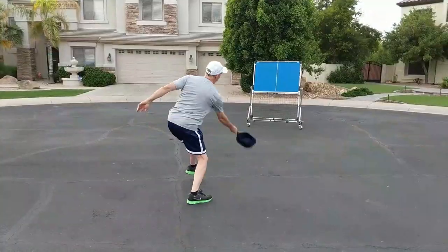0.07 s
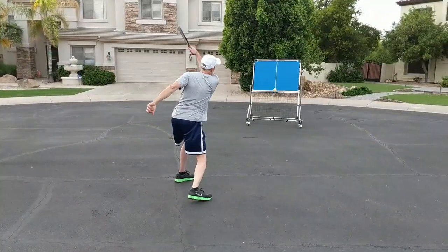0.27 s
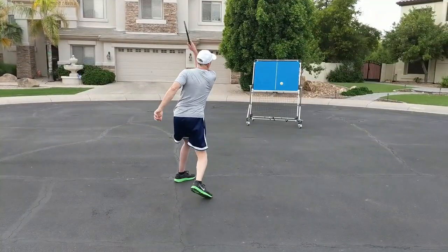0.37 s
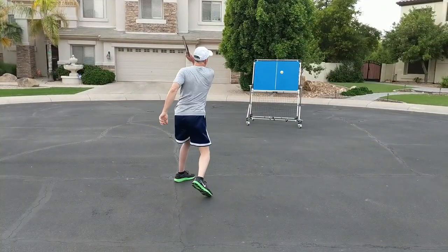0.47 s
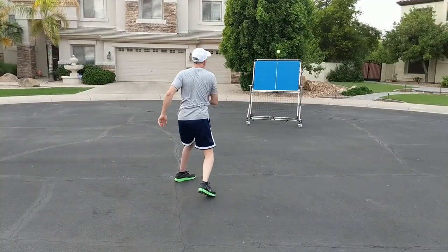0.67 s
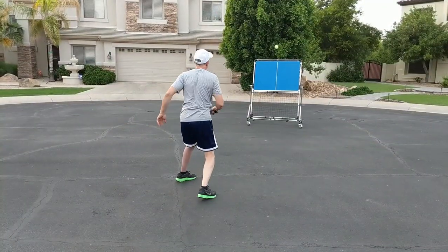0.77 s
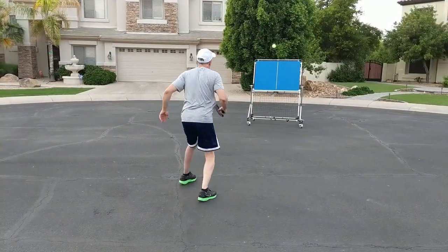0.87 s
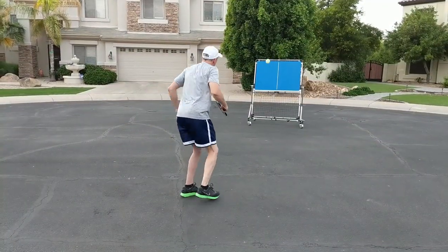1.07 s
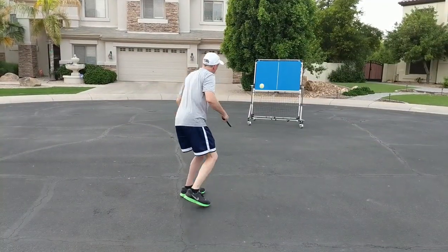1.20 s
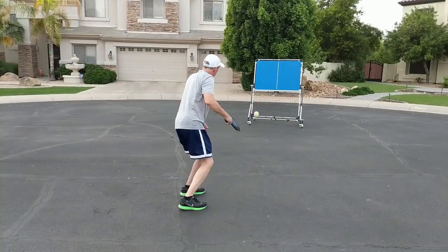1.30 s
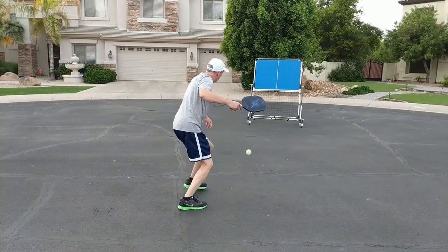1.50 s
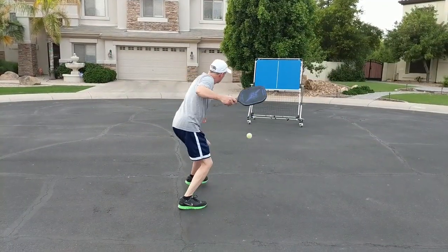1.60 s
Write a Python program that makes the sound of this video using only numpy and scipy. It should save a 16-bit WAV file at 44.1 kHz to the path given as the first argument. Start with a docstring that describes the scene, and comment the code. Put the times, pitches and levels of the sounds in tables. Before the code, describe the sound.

A paddle hits a hollow plastic ball with a sharp pop. The ball knocks a panel that booms and rattles, shoes scuff on grit, and the ball clacks on asphalt. The nearby microphone catches echoes from houses.

```python
"""Paddle and rebound panel on a paved street

One microphone near the play, house fronts farther off. A hard paddle pops a hollow plastic ball
against an upright panel, which booms while its loose frame rattles; the ball drops back on the
asphalt, and the houses echo the blows. Shoes scuff and click on grit, over a quiet outdoor rumble."""
import sys
import numpy as np
from scipy import signal
from scipy.fft import rfft, irfft
from scipy.io import wavfile

SR = 44100
rng = np.random.default_rng(int(sys.argv[2]) if len(sys.argv) > 2 else 0)


def store_wav(level_fs):
    """Save 16-bit WAV to argv[1]."""
    pcm = np.round(np.clip(np.atleast_2d(level_fs), -1, 1) * 32767)
    wavfile.write(sys.argv[1], SR, pcm.T.astype(np.int16))


N = 72765
T = np.arange(N) / SR
SHORT_T = T[:2048]
HZ = np.fft.rfftfreq(N, 1 / SR)
PADDLE_S, PANEL_S, BOUNCE_S = .2199, .5617, 1.6004

# Modes of the ball's three contacts: on the paddle, the panel and the asphalt.
# Each row: frequency in Hz, level in dB, seconds to fall 60 dB.
PADDLE_MODES = [(245, -19.5, 0.031), (1052, -5, 0.053), (1290, -13, 0.016), (1662, -14.5, 0.015),
                (2200, -15, 0.016), (2657, -9.5, 0.012), (3247, -7.5, 0.014), (3566, -4.5, 0.011),
                (4170, -6.5, .012), (5080, -14, 0.013), (6120, -20.5, 0.008), (6570, -13.5, 0.011),
                (7590, -27.5, .008), (9040, -17, 0.013)]
PANEL_MODES = [(89, -56, 0.46), (119, -44.5, 0.53), (172.6, -37, 0.5), (230.5, -30, 0.22), (210, -7, 0.024),
               (273.7, -37, 0.34), (389.5, -44.5, 0.27), (579, -42, 0.22), (726, -36, 0.15),
               (1160, -11.5, 0.017), (1336, -20.5, 0.02), (2025, -18, 0.018), (2500, -22.5, 0.018),
               (4170, -24, 0.02), (5670, -25.5, 0.014), (8980, -29.5, 0.016)]
BOUNCE_MODES = [(272, -24.5, 0.017), (1510, -35, 0.014), (1806, -31, 0.018), (2010, -38, 0.025),
                (2700, -30, 0.011), (3990, -29, 0.016), (4920, -26.5, 0.01), (6100, -45, 0.013),
                (7480, -32, 0.013), (8300, -23, 0.015), (9850, -44, 0.038)]
# Spectra of each contact's crack and of the frame's buzz. Each row: frequency in Hz, relative dB.
PADDLE_CRACK_SPECTRUM = [(50, 1.5), (250, -6.5), (600, -19), (1100, 0.5), (4000, -10.5), (6000, -12),
                         (9300, -20), (11000, -27.5), (16000, -46)]
PANEL_CRACK_SPECTRUM = [(50, -20), (200, 0), (500, -13.5), (1200, 7.5), (3200, -8.5), (5000, 3),
                        (9000, -12.5), (11000, -22), (16000, -44)]
BOUNCE_CRACK_SPECTRUM = [(50, -18), (200, 3), (800, -10), (2000, -5), (4500, -0.5), (8500, 3.5),
                         (10500, -14), (12500, -27), (16000, -42)]
FRAME_SPECTRUM = [(150, 19), (400, 10.5), (750, 13), (1300, 12.5), (2000, 3.5), (3800, 2.5), (5200, 7),
                  (7000, -8.5), (9300, -9), (11000, -22), (16000, -45)]
# Shoe scuffs. Each row: peak time, rise and fall in seconds, level in dB, tilt in dB per octave.
SHOE_SCUFFS = [(.045, 0.034, 0.091, -60.5, -2), (0.202, 0.021, 0.027, -59, -1.5),
               (0.295, 0.0037, 0.059, -52.5, 1), (.345, .03, 0.098, -56.5, -0.5),
               (.672, 0.015, 0.042, -48, 4), (.97, 0.026, 0.026, -61, 1.5),
               (1.146, 0.014, 0.019, -47.5, 1.5), (1.177, 0.026, 0.013, -44, -1.5),
               (1.383, 0.007, 0.0088, -45.5, 1), (1.30, .04, .04, -60.5, -4),
               (1.478, 0.014, 0.012, -57, -4)]
# Grit snapping underfoot. Each row: start in seconds, level in dB, centre in Hz, seconds to fall 60 dB.
GRIT_CLICKS = [(0.0879, -37, 2100, 0.011), (.1203, -46.5, 7200, 0.013), (0.6295, -38.5, 7140, 0.01),
               (0.6761, -23.5, 4990, .011), (0.7607, -32.5, 3400, 0.021), (0.9649, -42.5, 2410, 0.016),
               (1.1774, -37.5, 4400, 0.024), (1.2336, -48.5, 1200, 0.013), (1.3822, -39, 4100, 0.04),
               (1.5013, -44.5, 3010, 0.011), (1.6251, -47, 4300, .022)]
# Spectra of a dragging sole and of snapping grit. Each row: frequency in Hz, relative dB.
SOLE_SPECTRUM = [(80, -7.5), (250, 2), (600, -9), (1500, 5.5), (2600, 0.5), (4300, 1.5), (6300, -7.5),
                 (9200, -6), (10800, -40), (16000, -31)]
GRIT_SPECTRUM = [(100, -20), (700, -6), (1800, 1.5), (9000, -6.5), (11000, -22.5), (16000, -33)]
# Soft footfalls, swishes of the swing and far-off hoots.
# Each row: peak time and half-width in seconds, level in dB, centre in Hz.
SOFT_FOOTFALLS = [(.35, 0.021, -43.5, 494), (.661, 0.0063, -37.5, 340), (1.165, 0.022, -51, 290)]
SWING_SWISHES = [(.065, 0.045, -59, 2550), (.178, 0.024, -55, 2550)]
FAR_HOOTS = [(1.145, 0.032, -53.5, 802), (1.285, 0.081, -59.5, 740), (1.35, 0.33, -66, 610),
             (1.46, 0.043, -64, 722)]
# Echoes reaching the microphone from the ground and house fronts.
# Each row: delay in seconds, level in dB, low-pass cutoff in Hz, scattered share of the energy.
PADDLE_REFLECTIONS = [(.029, -32.5, 8100, 0.2), (0.1145, -18.5, 3940, 0.43), (.127, -21, 3500, 0.18),
                      (.1415, -16.5, 1270, .1), (.22, -35, 2000, 0.41), (.247, -31.5, 2470, 0.23),
                      (0.26, -25.5, 1590, .3), (.289, -27, 1500, 0.097)]
PANEL_REFLECTIONS = [(.094, -10.5, 900, 0.82), (0.14, -12, 506, 0.19), (.235, -24, 900, .5)]
# Decay of the street's diffuse tail. Each row: frequency in Hz, seconds to fall 60 dB.
STREET_T60 = [(100, 0.7), (300, 1.87), (1000, 1), (3000, 1.5), (6000, 0.44), (12000, 1)]
# Spectra of that tail and of the outdoor rumble. Each row: frequency in Hz, relative dB.
STREET_SPECTRUM = [(100, -4.5), (300, 5.5), (600, 8), (1000, -0.5), (2000, 0.5), (4000, -5), (8000, -8.5),
                   (14000, -5)]
AIR_SPECTRUM = [(20, -40), (32, -20), (48, -7), (65, 2), (120, -3.5), (230, -10), (330, -18.5), (600, -16),
                (950, -19), (1600, -24), (2600, -26), (4500, -31.5), (7500, -38.5), (9200, -41),
                (11000, -42.5), (16000, -47)]


def paddle():
    """The loud pop: the face rings and cracks. More of the crack is thrown forward, to the houses."""
    face = ring(PADDLE_S, PADDLE_MODES, lag_s=.0013)
    crack = snap(PADDLE_S, PADDLE_CRACK_SPECTRUM, t60=.013)
    pop = face + amp(-10) * crack
    thrown = face + amp(-7) * crack
    ground = amp(-31) * delayed(pop, .0028)
    return pop + ground + echoes(thrown, PADDLE_REFLECTIONS, smear_t60=.05) + amp(-26) * street(thrown)


def panel():
    """The ball knocks the panel, which booms while its loose frame buzzes and rings."""
    boom = ring(PANEL_S, PANEL_MODES, lag_s=.00063)
    crack = snap(PANEL_S, PANEL_CRACK_SPECTRUM, t60=.019)
    buzz = unit(colour(grains(per_s=3300, spread_db=2), FRAME_SPECTRUM)) * decay(.86)
    buzz *= decay(.38, np.maximum(T - .14, 0))  # dies faster after 0.14 s
    zing = band(8340, width_hz=260) * np.minimum(T / .042, 1) ** 2 * decay(.24)
    frame = delayed(amp(-41.5) * buzz + amp(-43) * zing, PANEL_S)
    hit = boom + amp(-18) * crack + frame
    return hit + echoes(hit, PANEL_REFLECTIONS, smear_t60=.059) + amp(-23.5) * street(hit)


def bounce():
    """The returning ball clacks on the asphalt and reaches the microphone dry."""
    shell = ring(BOUNCE_S, BOUNCE_MODES, lag_s=.00056)
    return shell + amp(-17.5) * snap(BOUNCE_S, BOUNCE_CRACK_SPECTRUM, t60=.011)


def shoes():
    """Soles drag over rough asphalt; single pieces of grit snap."""
    out = np.zeros(N)
    lead_s = .1
    t = T[:SR // 3] - lead_s  # zero at the scuff's peak
    for peak_s, rise, fall, db, tilt_db in SHOE_SCUFFS:
        stroke = np.where(t < 0, np.exp(-(t / rise) ** 2), np.exp(-abs(t) / fall))
        rub = unit(colour(grains(per_s=5000, spread_db=3, size=len(t)), SOLE_SPECTRUM, tilt_db))
        out += amp(db) * delayed((stroke * rub)[t > -peak_s], peak_s - lead_s)
    for start_s, db, hz, t60 in GRIT_CLICKS:
        out += amp(db) * snap(start_s, GRIT_SPECTRUM, t60, peak_hz=hz, peak_db=13.5)
    return out + amp(-24.5) * street(out)


def player():
    """Shoes scuff, feet land softly and the swing swishes through the air."""
    return shoes() + swells(SOFT_FOOTFALLS, width_hz=410) + swells(SWING_SWISHES, width_hz=760)


def echoes(x, reflections, smear_t60):
    """Each surface sends a duller, partly scattered copy back to the microphone."""
    response = np.zeros(N)
    for delay_s, db, cutoff_hz, share in reflections:
        scatter = rng.standard_normal(len(SHORT_T)) * decay(smear_t60, SHORT_T)
        path = np.sqrt(share) * scatter / np.linalg.norm(scatter)
        path[0] += np.sqrt(1 - share)  # the mirror-like part
        dulled = signal.lfilter(*signal.butter(2, cutoff_hz, fs=SR), path)
        response += amp(db) * delayed(dulled, delay_s)
    return signal.fftconvolve(x, response)[:N]


def street(x, delay_s=.072, build_s=.047):
    """Houses and trees farther off scatter the sound into a late diffuse tail."""
    hz, t, bands = signal.stft(rng.choice([-1., 1.], N), SR, nperseg=256)
    bands = bands * decay(curve_at(STREET_T60, hz)[:, None], t)
    bands *= amp(curve_at(STREET_SPECTRUM, hz))[:, None]
    tail = signal.istft(bands, SR, nperseg=256)[1][:N] * np.minimum(T / build_s, 1)
    return delayed(signal.fftconvolve(x, tail / np.linalg.norm(tail))[:N], delay_s)


def outdoor_air():
    """A quiet steady rumble, with faint hoots in the distance."""
    rumble = amp(-56) * colour(rng.standard_normal(N), AIR_SPECTRUM)
    return rumble + swells(FAR_HOOTS, width_hz=79)


def ring(start_s, modes, lag_s, build_cycles=.67):
    """Struck modes swell and decay; slower bending waves let the low ones start later."""
    out = np.zeros(N)
    for hz, db, t60 in modes:
        t = np.maximum(T[T < 2 * t60] - lag_s / (1 + hz / 1000), 0)
        attack = 1 - np.exp(-hz * t / build_cycles)
        out[:len(t)] += amp(db) * attack * decay(t60, t) * np.sin(2 * np.pi * hz * t)
    return delayed(out, start_s)


def snap(start_s, spectrum, t60, **peak):
    """A hard contact: a burst of coloured noise that dies at once."""
    lead = len(SHORT_T) // 8  # room for the filter to spread ahead of the burst
    burst = np.pad(rng.choice([-1., 1.], len(SHORT_T)) * decay(t60, SHORT_T), (lead, 0))
    return delayed(colour(burst, spectrum, **peak), start_s - lead / SR)


def grains(per_s, spread_db, size=N):
    """A random train of tiny impacts of uneven size."""
    strength = rng.standard_normal(size) * amp(spread_db * np.minimum(rng.exponential(1, size), 4))
    return strength * (rng.random(size) < per_s / SR)


def swells(rows, width_hz):
    """Soft noises that each swell and fade in one resonance."""
    return sum(amp(db) * np.exp(-((T - peak_s) / half_width_s) ** 2) * band(hz, width_hz)
               for peak_s, half_width_s, db, hz in rows)


def band(hz, width_hz):
    """Noise in one resonance."""
    return unit(irfft(rfft(rng.standard_normal(N)) / (1 + (2 * (HZ - hz) / width_hz) ** 2), N))


def colour(x, spectrum, tilt_db=0, peak_hz=1000, peak_db=0, peak_octaves=.59):
    """Filters by a spectrum, a tilt per octave and one broad peak; white noise keeps its level."""
    hz = np.fft.rfftfreq(len(x), 1 / SR)
    octaves = np.log2((hz + 1) / peak_hz)
    bump_db = peak_db * np.exp(-(octaves / peak_octaves) ** 2)
    gain = amp(curve_at(spectrum, hz) + tilt_db * octaves + bump_db)
    return irfft(rfft(x) * unit(gain), len(x))


def curve_at(points, hz):
    """Interpolates a table on a log-frequency axis."""
    point_hz, value = np.transpose(points)
    return np.interp(np.log(hz + 1), np.log(point_hz + 1), value)


def decay(t60, t=T):
    """Falls 60 dB in t60 seconds."""
    return np.exp(-np.log(1000) * t / t60)


def delayed(x, start_s):
    """Starts x at start_s, or at zero if that is negative."""
    return np.pad(x, (max(round(start_s * SR), 0), max(N - len(x), 0)))[:N]


def amp(db):
    """Decibels to gain."""
    return 10 ** (np.asarray(db) / 20)


def unit(x):
    """Scales to rms 1."""
    return x / np.sqrt(np.mean(x ** 2) + 1e-20)


def scene():
    """One stroke and its return, heard in mono from one spot on the street."""
    background = outdoor_air() + player()
    return (paddle() + panel() + bounce() + background)[None]


def record(dry, ceiling=.95, cutoff_hz=16300):
    """The microphone chain rounds off the loudest peak, then cuts the top of the treble."""
    rounded = dry / (1 + (dry / ceiling) ** 6) ** (1 / 6)
    lowpass = signal.firwin(255, cutoff_hz, window=("kaiser", 9), fs=SR)
    return signal.oaconvolve(rounded, lowpass[None], "same")


dry = scene()
out = record(dry)
store_wav(out)
```